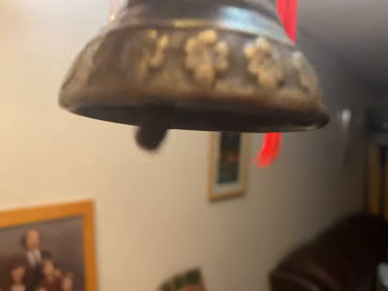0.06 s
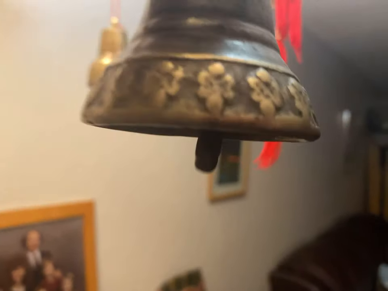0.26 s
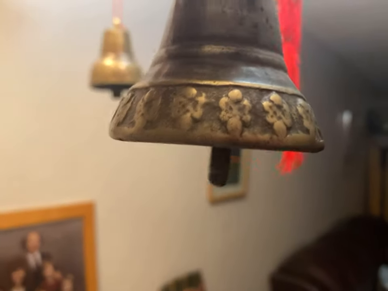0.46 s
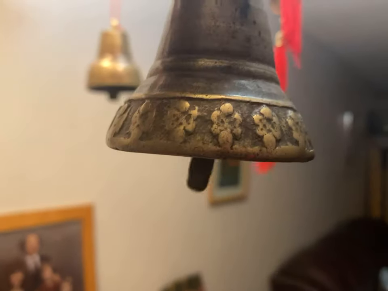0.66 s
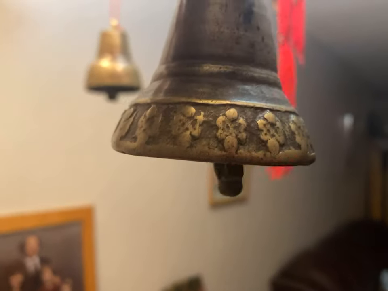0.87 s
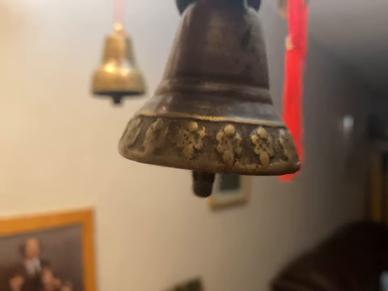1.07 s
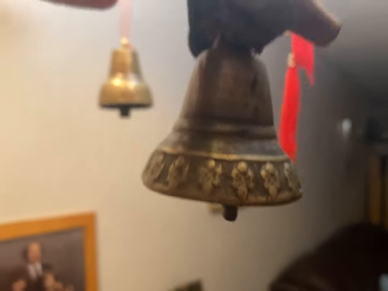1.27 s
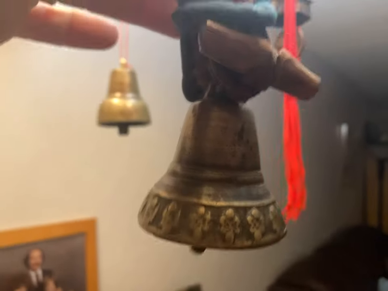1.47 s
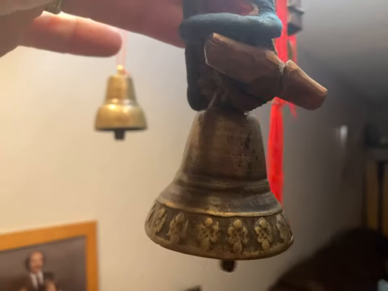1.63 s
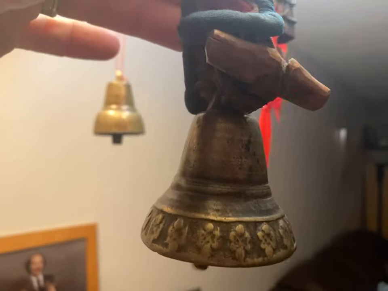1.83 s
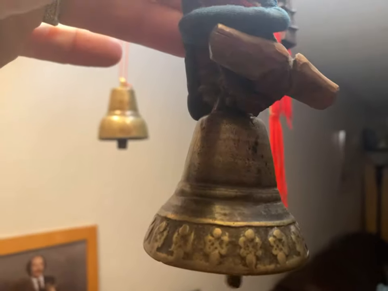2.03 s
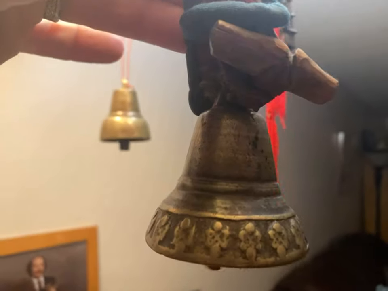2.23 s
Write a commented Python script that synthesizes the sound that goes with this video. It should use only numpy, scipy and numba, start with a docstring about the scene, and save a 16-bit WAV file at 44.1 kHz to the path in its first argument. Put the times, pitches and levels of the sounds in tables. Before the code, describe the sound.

A small bronze hand bell rings close to the microphone, its clapper striking sharply at about 0.2 and 0.4 seconds. The clapper then grazes the rim with thin, faint ticks near 0.6 and 0.9 seconds, and barely at 1.8. The high, clear tones waver and slowly fade, still sounding at the end, around 2.3 seconds. Soft room noise and a faint hum lie underneath.

```python
"""A small bronze hand bell swings close to the microphone in a quiet room.
Its clapper strikes one side of the rim, then the other, and later only grazes it; each touch clicks.
The bell rings with many tones: close pairs beat against each other, and all waver as the bell turns.
Soft room noise and a faint hum lie underneath. An automatic volume control turns everything down
after the blows and slowly lets the room noise back."""
import sys
import numpy as np
from scipy import signal
from scipy.fft import rfft, irfft
from scipy.io import wavfile
from scipy.ndimage import uniform_filter1d, minimum_filter1d
from numba import njit

SR = 44100
rng = np.random.default_rng(int(sys.argv[2]) if len(sys.argv) > 2 else 0)


def waveform_to_disk(signal):
    """Save audio, clipped to [-1, 1], as 16-bit WAV at the path in sys.argv[1]."""
    frames = np.transpose(np.atleast_2d(signal))
    scaled = np.clip(frames, -1, 1) * 32767
    samples = np.round(scaled).astype(np.int16)
    wavfile.write(sys.argv[1], SR, samples)


N = 101429

# tone colour of the room noise (frequency [Hz], relative level [dB])
ROOM_COLOUR = [(25, -34), (42, -26), (60, -3), (90, -5), (200, -1), (420, -1), (700, -6), (1100, -5),
               (2000, -14), (4000, -25.5), (7000, -34), (12000, -36), (16000, -54)]
# faint hum tones in the room (frequency [Hz], level [dB])
HUM_TONES = [(318, -67), (365, -66), (506, -64), (736, -67), (1005, -69)]
# hard blows, one on each side of the rim (time [s], click level [dB])
BLOWS = [(0.209, -14), (.3831, -15)]
# light grazes of the clapper (time [s], offset to each tone's graze level [dB], click level [dB])
GRAZES = [(.6435, 2, -31), (.9094, 1, -36), (1.761, -1, -45), (1.9984, -30, -64)]
# tone colour of a blow's click (frequency [Hz], relative level [dB])
BLOW_COLOUR = [(400, -25), (1200, -16), (2200, -9), (3300, -4), (6000, -1), (8500, 0), (11000, -7),
               (12500, 2), (15500, -1.5), (17000, -20)]
# tone colour of a graze's click (frequency [Hz], relative level [dB])
GRAZE_COLOUR = [(1500, -32), (7000, -23.5), (7900, -7), (9000, -18), (11300, -22), (12400, -1.5),
                (13500, -5), (15500, 3), (17000, -24.5)]
# the ringing tones, listed by frequency [Hz]; 12565 and 12722 Hz are the clapper's own ring, the rest the
# bell's: (time to fade by 60 dB [s], first blow level [dB], return blow level [dB], graze level [dB])
RING_TONES = { 2563: (4.0, -47, -41, -94), 2592.7: (6.8, -21.2, -23, -92), 4966.1: (2.25, -31, -8.3, -90),
              5042: (2.3, -42, -18.5, -90), 5167.6: (2.4, -18.5, -27, -90),
              5354.8: (2.6, -13.3, -10.3, -90), 9066: (1.03, -20.5, -15.7, -73.5),
              9229: (0.9849, -19, -8.4, -80.5), 10038: (.35, -14, -24, -50.5), 10064: (.35, -23, -33, -66),
              12565: (.07, -29, -44, -62), 12722: (.08, -27, -45, -61), 13933: (.095, -8, -28, -61),
              14150: (.13, -17, -11, -55), 15390: (.08, -36, -44, -60), }
# one tone fades and returns as the bell turns its quiet side to the microphone (time [s], level [dB])
TURNING_LEVEL = [(.21, 0), (.38, -6), (.75, -7), (.97, -18), (1.28, -1), (1.5, 2), (1.8, 6), (2.3, 3)]
# the whole ring rises and falls as the bell sways nearer and farther (time [s], level [dB])
SWAY_LEVEL = [(0, 0), (.85, -.5), (1.0, 1.5), (1.3, -1), (1.6, .5), (2.3, -.3)]

TURNING_HZ = 5167.6  # the tone that follows TURNING_LEVEL


def undb(db):
    """Turns decibels into a factor to multiply by."""
    return 10 ** (np.asarray(db) / 20)


def fade(age, t60):
    """Starts at age zero and dies away by 60 dB every t60 seconds."""
    return (age >= 0) * np.exp(-np.log(1000) * np.maximum(age, 0) / t60)


def drift(per_second):
    """A smooth random wobble that heads for a new value per_second times a second."""
    hold = int(SR / per_second)
    steps = rng.standard_normal(size=64)[np.arange(N) // hold % 64]
    return uniform_filter1d(uniform_filter1d(steps, hold), hold)


def coloured(sound, colour):
    """Makes some frequencies stronger and others weaker; white noise keeps its overall level."""
    hz, db = np.array(colour, float).T
    frequencies = np.maximum(np.arange(N // 2 + 1) * SR / N, 1)
    gain = undb(np.interp(np.log(frequencies), np.log(hz), db))
    return irfft(rfft(sound) * gain / np.sqrt(np.mean(gain ** 2)), N)


@njit
def follow_level(sound, attack_s, release_s):
    """Tracks how loud a sound is, rising over about attack_s and falling over about release_s."""
    levels, level = np.empty(len(sound)), 0.
    for i in range(len(sound)):
        gap = abs(sound[i]) - level
        level += gap / (SR * (attack_s if gap > 0 else release_s))
        levels[i] = level
    return levels


def room(t):
    """Soft, steady noise with a few unsteady hum tones."""
    hum = np.zeros(N)
    for hz, db in HUM_TONES:
        waver = 1 + .69 * drift(per_second=7)
        hum += undb(db) * waver * np.sin(2 * np.pi * hz * t + drift(per_second=7))
    return undb(-51.4) * coloured(rng.standard_normal(N), ROOM_COLOUR) + hum


def click(age, colour):
    """Metal meets metal: a short crack, its echo from the nearest wall and a brief room tail."""
    crack_t60_s, echo_delay_s = .0054, .0085
    crack = fade(age, crack_t60_s)
    echo = undb(-14) * fade(age - echo_delay_s, crack_t60_s)
    tail = undb(-24) * fade(age, t60=.11)
    return coloured(rng.standard_normal(N) * (crack + echo + tail), colour)


def clapper(t):
    """The clapper clicks once in a hard blow; in a graze it touches twice, with two thin ticks."""
    bounce_s, bounce_db = .0055, -4
    clicks = sum(undb(db) * click(t - start, BLOW_COLOUR) for start, db in BLOWS)
    for start, _, db in GRAZES:
        first = click(t - start, GRAZE_COLOUR)
        second = undb(bounce_db) * click(t - start - bounce_s, GRAZE_COLOUR)
        clicks += undb(db) * (first + second)
    return clicks


def contact(age, rise_s=.0004):
    """The ring builds smoothly from 0 to 1 while the clapper presses on the rim."""
    return np.sin(np.pi / 2 * np.clip(age / rise_s, 0, 1)) ** 2


def bell(t):
    """The bronze bell and its clapper ring in fading tones: a blow restarts each one, a graze adds mostly to
    the high ones."""
    # one low tone still sounds from an earlier blow
    ring = undb(-60) * fade(t, t60=6.3) * np.sin(2 * np.pi * 2592.7 * t)
    for hz, (t60, first_db, return_db, graze_db) in RING_TONES.items():
        strength = np.zeros(N)
        for (start, _), db in zip(BLOWS, (first_db, return_db)):
            fresh = undb(db) * fade(t - start, t60)
            strength += contact(t - start) * (fresh - strength)  # the new ring replaces the old
        for start, offset_db, _ in GRAZES:
            strength += contact(t - start) * undb(graze_db + offset_db) * fade(t - start, t60)
        waver_db = .4 * drift(per_second=3)  # each tone wavers as the bell turns
        if hz == TURNING_HZ:
            waver_db += np.interp(t, *np.array(TURNING_LEVEL).T)
        tone = np.sin(2 * np.pi * (hz * t + rng.random()))
        ring += strength * undb(waver_db) * tone
    sway_db = np.interp(t, *np.array(SWAY_LEVEL).T)
    return ring * undb(sway_db)


def scene():
    """The bell and its clapper over the noise of the room, in one channel."""
    t = np.arange(N) / SR
    return (bell(t) + clapper(t) + room(t))[None]


def record(dry):
    """The recorder turns loud sound down, recovers slowly, holds back peaks and cuts the top treble."""
    threshold_db, ratio, peak_limit, top_hz = -13, 2.2, .85, 16100
    level = follow_level(dry[0], attack_s=.01, release_s=1.45)
    excess = np.maximum(level / undb(threshold_db), 1)
    turned_down = dry * excess ** (1 / ratio - 1)
    window = int(.003 * SR)  # the volume dips for a few milliseconds around a peak that is too high
    peak_gain = peak_limit / np.maximum(np.abs(turned_down), peak_limit)
    limited = turned_down * uniform_filter1d(minimum_filter1d(peak_gain, window), window)
    treble_cut = signal.ellip(8, .2, 80, top_hz, fs=SR, output="sos")
    return signal.sosfilt(treble_cut, limited)


dry = scene()
out = record(dry)
waveform_to_disk(out)
```